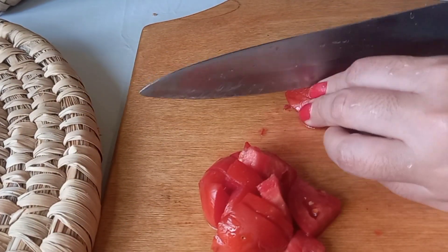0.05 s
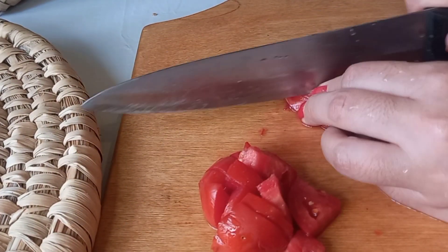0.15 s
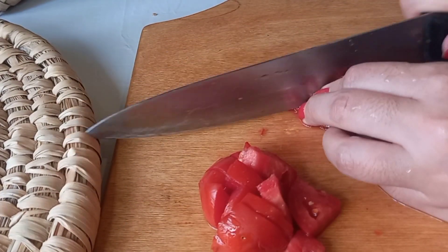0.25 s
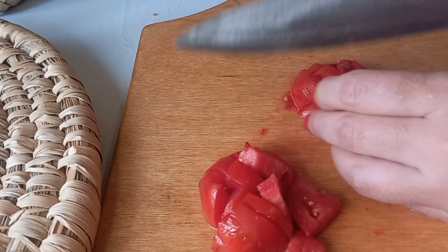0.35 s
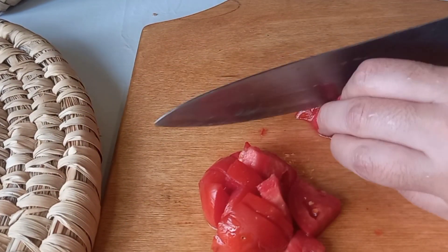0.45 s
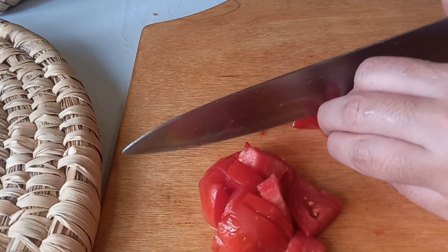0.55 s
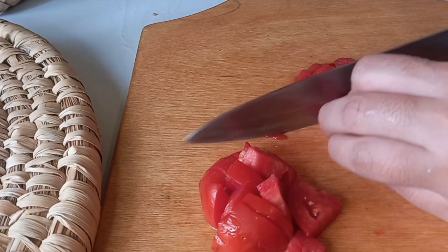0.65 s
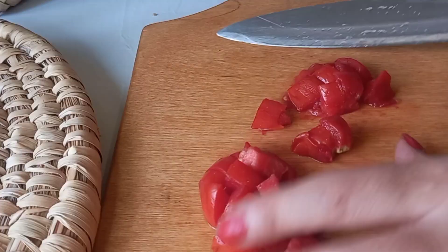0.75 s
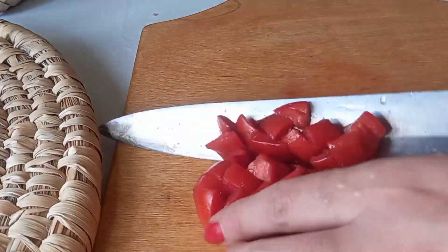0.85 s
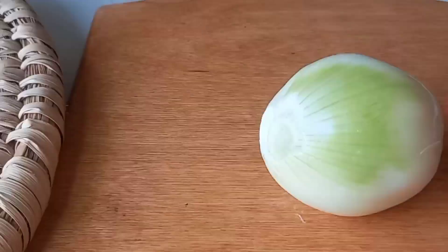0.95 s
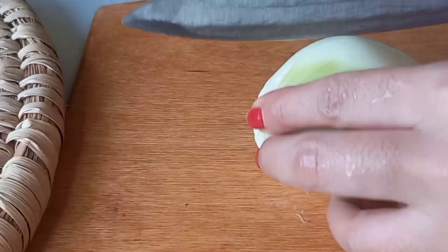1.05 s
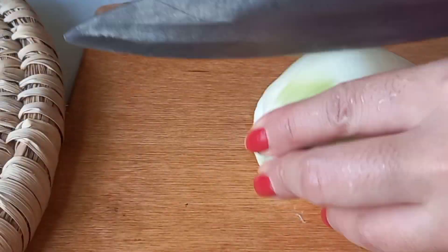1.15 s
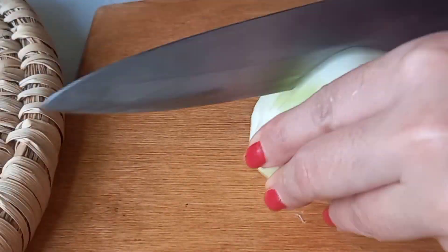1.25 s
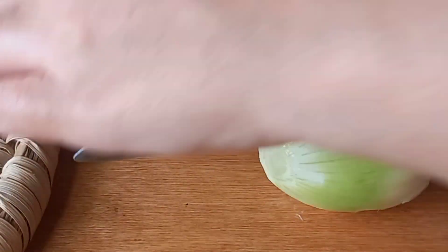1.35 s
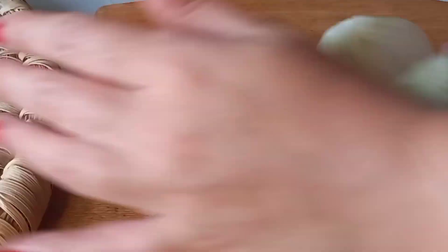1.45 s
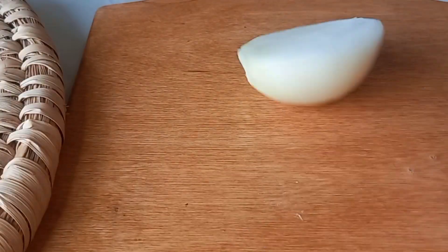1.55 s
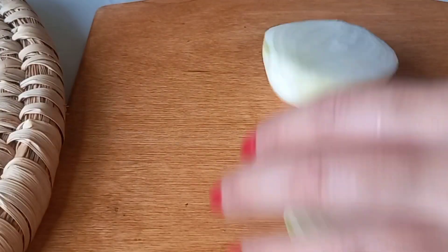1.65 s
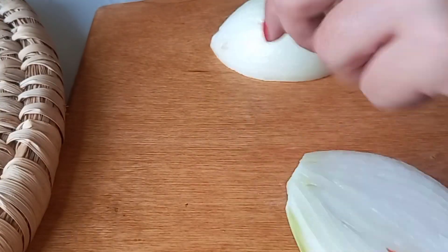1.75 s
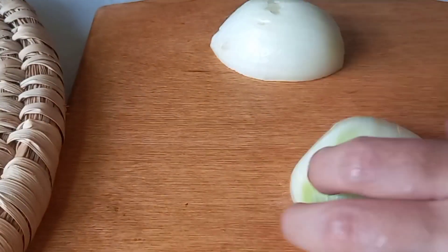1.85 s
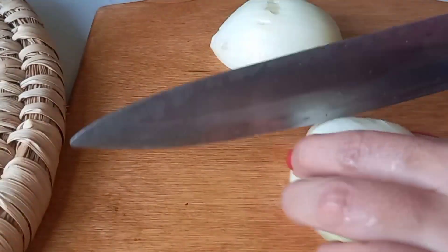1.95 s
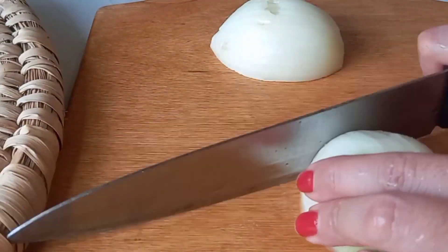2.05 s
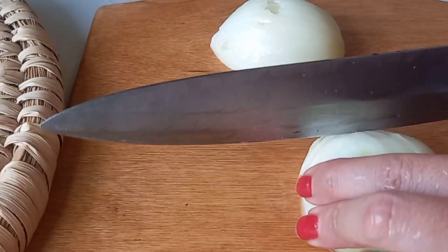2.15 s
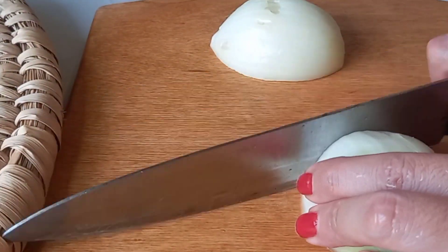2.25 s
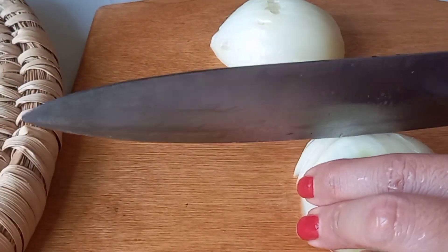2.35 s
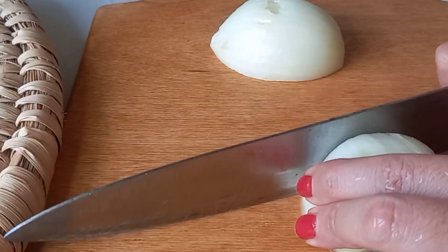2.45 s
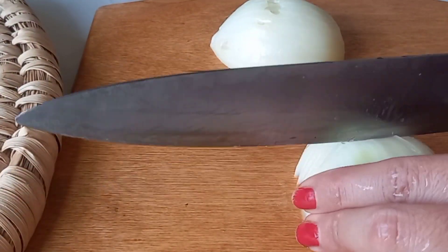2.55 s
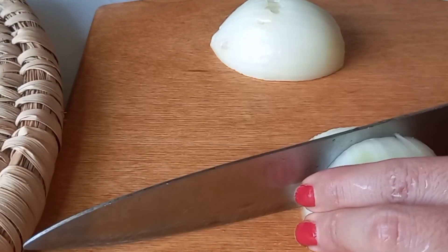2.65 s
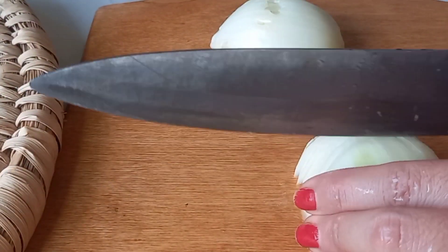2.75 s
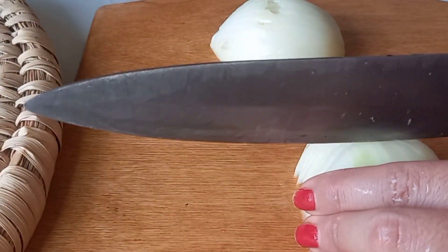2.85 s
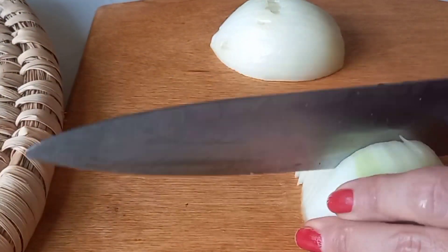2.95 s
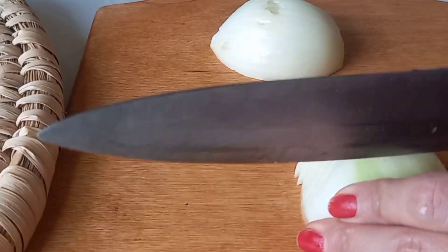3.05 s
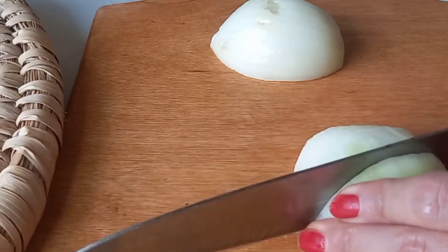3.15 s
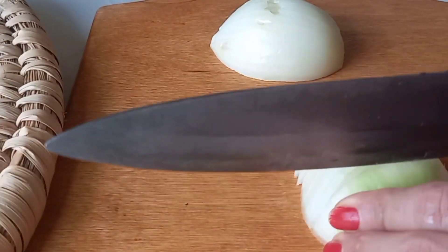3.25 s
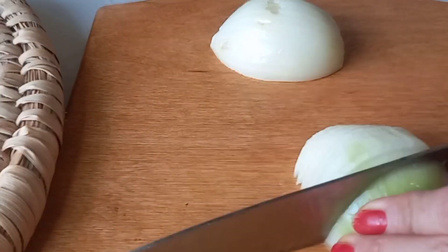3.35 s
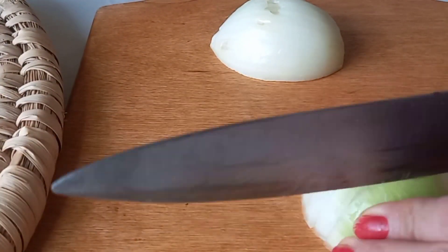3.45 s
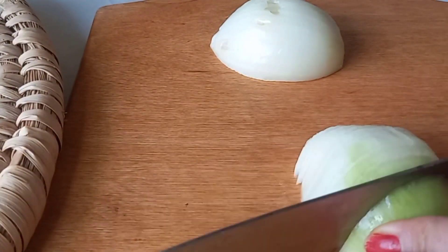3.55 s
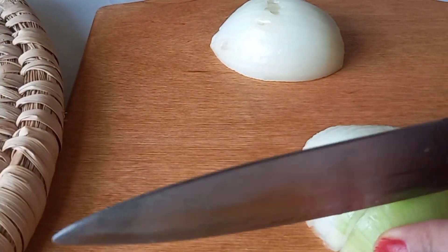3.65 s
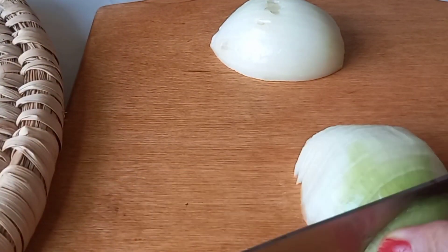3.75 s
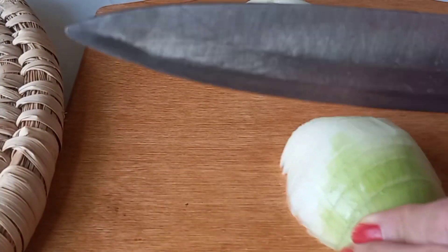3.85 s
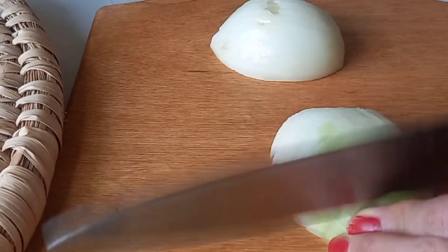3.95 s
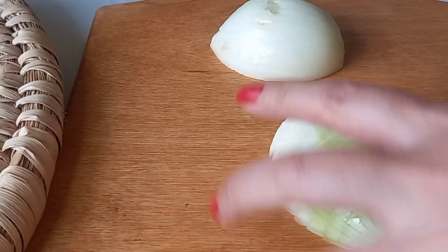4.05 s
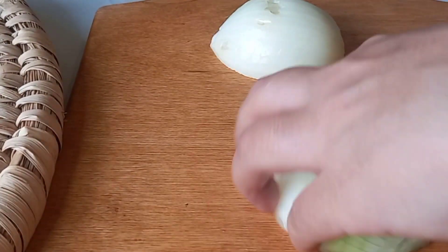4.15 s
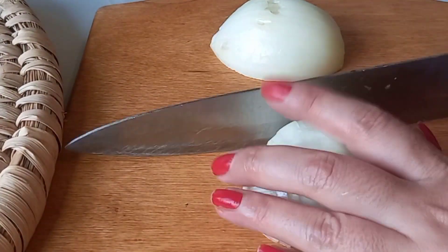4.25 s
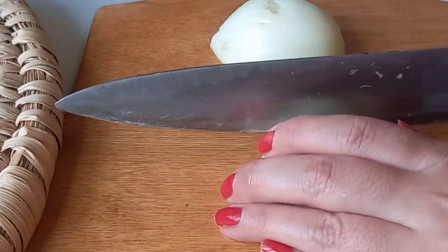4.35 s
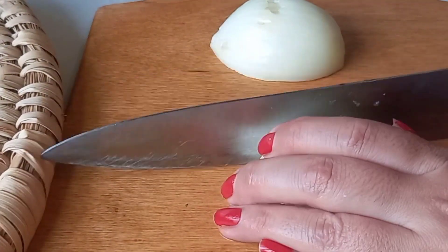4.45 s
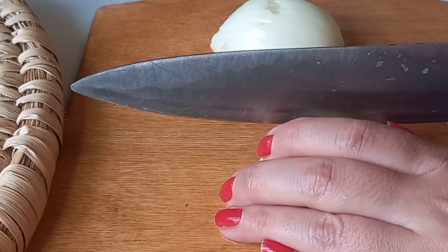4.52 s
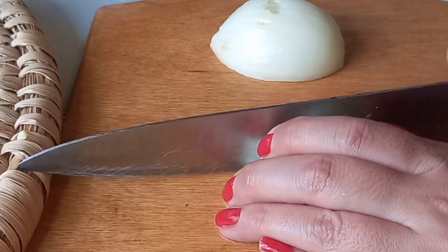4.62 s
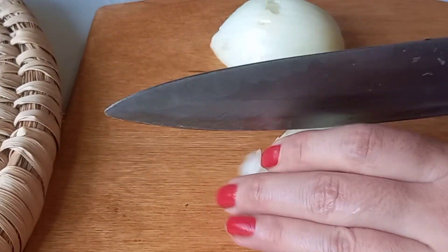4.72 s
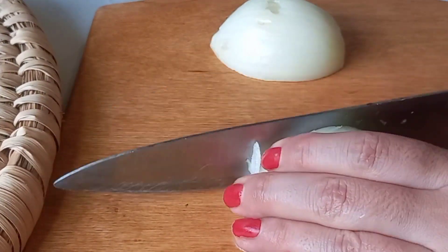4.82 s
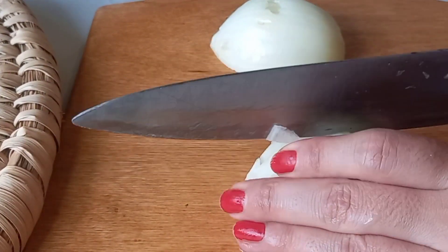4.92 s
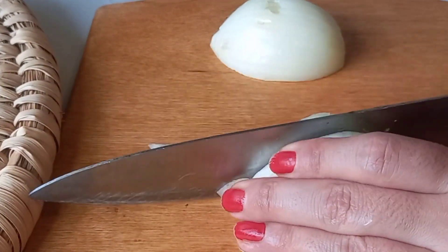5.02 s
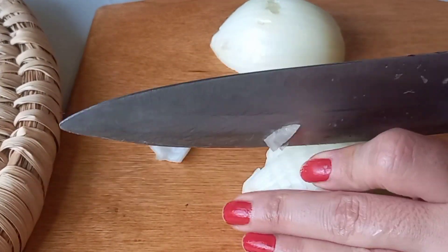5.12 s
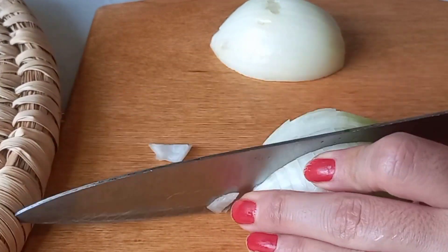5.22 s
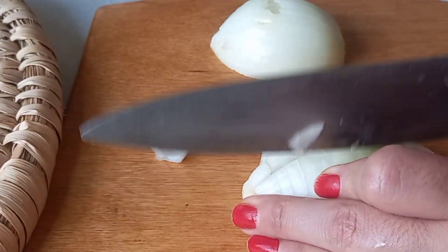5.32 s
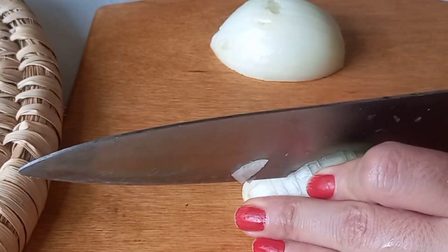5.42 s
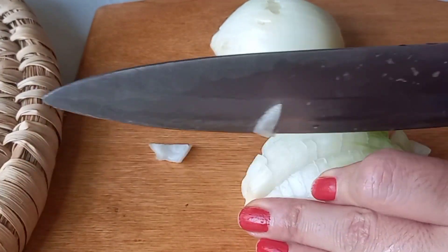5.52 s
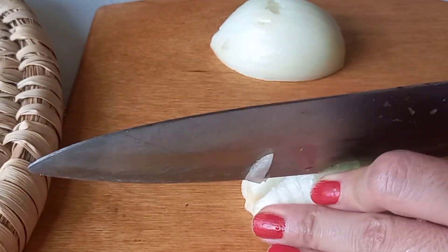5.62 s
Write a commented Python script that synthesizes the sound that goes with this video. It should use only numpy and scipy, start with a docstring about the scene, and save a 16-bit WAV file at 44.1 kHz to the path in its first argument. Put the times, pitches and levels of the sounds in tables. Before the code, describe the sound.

A knife crunches wetly through tomato, then onion, on a wooden board, with one deep halving thud and dull uneven knocks in a quiet kitchen.

```python
"""A quiet kitchen, wavering noise and a soft hiss, lies under a low rumble that swells and sinks.
A knife cuts tomato, then onion, on a wooden board close under a phone: cells burst as dense clicks,
the hand's push rocks the board, then the edge knocks and chatters, exciting the board's damped modes.
Early on the onion is halved with a deep thud, a brief low sway of the board that swells and dies away.
Late on the blade scrapes once: random slips ring its narrow resonances."""
import sys
import numpy as np
from scipy import signal
from scipy.fft import rfft, irfft
from scipy.io import wavfile

SR = 44100
rng = np.random.default_rng(int(sys.argv[2]) if len(sys.argv) > 2 else 0)


def put_to_file(sound):
    """Save the sound as 16-bit audio at rate SR, in the file named by the first command-line argument."""
    columns = np.atleast_2d(sound).T  # one column per channel
    safe = np.clip(columns, -1, 1)
    whole_steps = np.round(safe * 32767)
    wavfile.write(sys.argv[1], SR, whole_steps.astype(np.int16))


N = 250488
TIME = np.arange(N) / SR

# Spectrum of the kitchen's noise. Each row: frequency in Hz, relative level in dB.
KITCHEN_SPECTRUM = [(20, 10), (50, 18), (110, 16), (220, 0.5), (400, 15.5), (600, -30), (1500, -65),
                    (3000, -114), (8000, -25.5), (16000, -32)]
# Spectrum of the soft hiss. Each row: frequency in Hz, relative level in dB.
HISS_SPECTRUM = [(200, 14.5), (450, 12.5), (900, 5.5), (1600, 2.5), (3000, -0.5), (5000, -4.5),
                 (6700, -3.5), (7400, -25.5), (10000, -19.5), (12000, -31.5), (16000, -36.5)]
# Rise and fall of the hiss. Each row: time in seconds, level in dB before a fixed gain.
HISS_LEVEL = [(0.0, -84), (0.88, -81), (1.36, -70), (1.52, -70), (1.93, -65), (2.17, -65), (2.75, -60),
              (3.04, -65), (3.15, -73), (3.59, -76), (3.7, -82), (3.97, -81), (4.1, -76), (4.52, -77),
              (4.78, -71), (5.08, -71), (5.44, -79), (5.68, -78)]
# Course of the low rumble. Each row: time in seconds, level in dB, centre in Hz before the waver.
RUMBLE = [(0, -82, 100), (.9, -78, 110), (1.25, -61, 118), (1.65, -61, 122), (1.88, -45, 130),
          (2.05, -60, 150), (2.27, -46, 232), (2.55, -43, 142), (2.78, -50, 122), (3.08, -42, 102),
          (3.22, -48, 100), (3.45, -46, 130), (3.64, -63, 115), (4.05, -58.5, 110), (5.68, -66, 110)]
# The edge goes through flesh. Each row: start in seconds, length in seconds, crackle level in dB,
# build-up from start to end in dB, board body and fizz in dB relative to the crackle,
# rocking of the board in dB.
CUTS = [(0.236, .025, -67, 0, -3, -25, -51), (0.269, .033, -59, -2, -8, 0, -65),
        (0.5, .03, -70, 0, -10, -22, -70), (0.599, .095, -72, 0, 6, -10, -70),
        (0.759, .003, -45, 0, 9, -18, -70), (0.764, .09, -67, -9, 14, -11, -56),
        (0.911, .003, -52, 0, -7, -3, -70), (0.997, .031, -75, 0, 19, -16, -65),
        (1.212, .007, -43, 0, -8, -13, -36), (1.222, .07, -61, 0, -12, -7, -52),
        (1.299, .023, -48, 0, -1, -9, -37), (1.385, .031, -53, 8, 10, -11, -50),
        (1.418, .022, -29.5, 0, -2, -9.5, -50), (1.446, .032, -47, -3, 4, -8, -50),
        (1.862, .027, -60, 0, 9, -8, -34), (2.017, .064, -52.5, 2, 8, -6, -50),
        (2.192, .045, -52, 19, 10, -3, -35), (2.377, .045, -50, 21, 9, -2, -50),
        (2.603, .017, -33, -6, 2, -11, -30), (2.626, .022, -37, 3, 3, -5, -45),
        (2.901, .0033, -28, 0, 7, -8, -50), (2.906, .015, -37.5, 0, -6, -3, -50),
        (3.092, .02, -31.5, 11, 1, -8, -29), (3.302, .019, -36, 12, 1, -10.5, -29),
        (3.348, .015, -30, -3, 3, -10, -25), (3.472, .013, -38, -6, 7, -7, -50),
        (3.501, .04, -57, 6, 14, -15, -48), (3.672, .025, -55, 0, 12, -9, -44),
        (3.949, .016, -35, 8, -5, -8, -36), (3.98, .039, -58, 0, 1, -9, -27),
        (4.422, .02, -37, 2, 0, -3, -36), (4.55, .045, -56, 0, 10, -7, -60),
        (4.594, .022, -45.5, 0, 8, -1, -31), (4.628, .024, -48, 0, 3, -2, -40),
        (4.744, .049, -50, 12, 13, -6, -29), (4.93, .019, -61, 0, 1, 2, -60),
        (4.957, .047, -43, 10, 10, -6, -28), (5.143, .079, -44, 8, 4, -7, -28),
        (5.366, .083, -45.5, 15, 5, -10, -34), (5.62, .06, -63.5, 0, 15, -8, -35)]
# Spectrum of bursting cells and of grit. Each row: frequency in Hz, relative level in dB.
CRACKLE_SPECTRUM = [(900, -16), (1800, 3.5), (2500, 8.5), (4200, 7), (6500, 6.5), (7300, -6), (9000, -27.5)]
# Spectrum of the treble of a cut. Each row: frequency in Hz, relative level in dB.
FIZZ_SPECTRUM = [(5500, -13), (7200, -9.5), (8200, 5.5), (10000, 11.5), (12500, 11), (15500, 9.5),
                 (17000, -7.5)]
# Bumps of hand and onion on the board. Each row: time of the peak in seconds, level in dB, frequency in Hz.
THUDS = [(1.062, -40, 157), (1.4315, -7, 118), (1.62, -39, 140), (1.765, -33, 115), (2.063, -24, 174),
         (2.81, -37, 70), (2.924, -19, 195), (4.04, -40, 97), (4.34, -39.5, 97), (5.335, -44, 110)]
# The edge meets the board. Each row: start in seconds, nominal level in dB over 10 ms,
# nominal ring (time to fall 60 dB) in seconds, centre of tone in Hz, nominal clack in dB
# relative to the tone, left minus right in dB.
KNOCKS = [(0.306, -50.5, .042, 450, -10, 0), (0.757, -44, .054, 855, 9, -5),
          (0.796, -47, .11, 700, -12, -4), (0.853, -47, .06, 460, -19, -5),
          (1.004, -48, .077, 580, -10, -11), (1.409, -35, .04, 735, 0, -18),
          (1.439, -39.5, .059, 630, 6, -7), (1.466, -41, .12, 630, 2, -2), (2.057, -29, .066, 480, -16, 1),
          (2.254, -32, .043, 540, -14, -2), (2.432, -24.5, .043, 457, -22, -2),
          (2.606, -20, .043, 730, -30, 0), (2.65, -33, .026, 400, -21, -2),
          (2.9193, -11.5, .014, 620, -15, -5), (2.924, -21, .018, 400, -20, -2),
          (3.1, -24.5, .035, 770, -18, -8), (3.1494, -20.5, .026, 685, -9.5, -4),
          (3.158, -24.5, .05, 670, -10, 0), (3.317, -28, .022, 700, -14, -7),
          (3.365, -28.5, .066, 470, -13, -2), (3.476, -26, .036, 780, -20, -6),
          (3.541, -25, .044, 530, -13.5, -3), (3.748, -24.5, .022, 650, -8, 0),
          (3.7557, -19.5, .04, 770, -9, -2), (3.958, -25, .044, 820, -17, -3.5),
          (3.996, -36, .058, 400, -13, 2), (4.05, -50, .07, 480, -7, -4), (4.124, -43, .07, 620, -13, -11),
          (4.238, -34, .053, 606, -21, -3), (4.428, -22, .037, 1000, -12, -2.5),
          (4.4435, -28, .034, 560, -20, -4), (4.635, -35, .072, 470, -25, -3.5),
          (4.789, -23, .02, 700, -20, -11), (4.7985, -25, .047, 620, -15, 0),
          (5.002, -26, .045, 510, -21, -1), (5.18, -37, .043, 700, -12, -7),
          (5.213, -16.5, .012, 800, -19, -1), (5.4465, -19.5, .015, 730, -8.5, -1),
          (5.451, -17, .043, 680, -11, -6), (5.653, -46.5, .065, 608, -22, -12)]
# Modes of the board, before chance at each knock or cut. Each row: frequency in Hz, relative level in dB.
BOARD_MODES = [(135, -11.5), (200, 3), (312, -3), (415, 3.5), (510, -2.5), (620, -21), (716, 4.5),
               (790, -1), (905, 0.5), (1040, -9), (1230, -7.5), (1520, -4.5), (1700, -10.5), (1930, -10.5),
               (2250, -10.5), (2680, -23), (3080, -25), (3610, -37), (4040, -26.5)]
# Spectrum of the board's dense reflections. Each row: frequency in Hz, relative level in dB.
WOOD_SPECTRUM = [(60, -35.5), (150, 5.5), (400, -6), (800, -7), (1300, -6), (2000, -16.5), (4300, -25.5),
                 (5200, -35), (8000, -45.5), (16000, -40.5)]
# Resonances of the scraping blade. Each row: frequency in Hz, width in Hz, relative level in dB.
BLADE_RESONANCES = [(1269, 38, 21), (1530, 34, -3), (1750, 45, -11), (1950, 49, 0), (2110, 49, -1.5),
                    (2775, 83, -43), (4010, 253, -16.5)]

# the blade passes one layer of flesh after another, with a lull between them
LAYER_S, LULL_SHARE, LULL_DB, BITE_S = .029, .27, -13, .006
# partway through each cut the hand's push rocks the board; heavier pushes rock it for longer
ROCK_SHARE, ROCK_HZ = .55, 108
# half length of the sway at 0 dB in cycles, and its change per dB of level
ROCK_CYCLES, ROCK_CYCLES_PER_DB = .78, .008
# dull knocks carry more of the board's bass than bright ones
BASS_DB, MIDDLE_HZ, BASS_DB_PER_OCTAVE = -7, 600, -3
# the scrape bites quickly and dies away as the blade lifts
SCRAPE_S, SCRAPE_DB, SCRAPE_RISE_DB_PER_S, SCRAPE_FALL_DB_PER_S = 4.549, -23.5, 2300, 600
TOP_HZ = 16000


def undb(db):
    """Amplitude ratio: decibels to gain."""
    return 10 ** (np.asarray(db) / 20)


def curve(rows):
    """Linear interpolation: each column of a table, joined by straight lines in time."""
    s, *columns = np.transpose(rows)
    return [np.interp(TIME, s, c) for c in columns]


def level(x, db, seconds):
    """Energy normalisation: the sound's energy equals that level held for that long."""
    energy_s = np.mean(np.sum(x ** 2, axis=-1)) / (seconds * SR)
    return x * undb(db) / np.sqrt(energy_s + 1e-20)


def through(x, response):
    """Convolution: a sound played through an impulse response, on both channels."""
    return signal.fftconvolve(np.atleast_2d(x), np.atleast_2d(response), axes=-1)[:, :x.shape[-1]]


def colour(x, points):
    """Minimum phase: a causal filter through (Hz, dB) points, built by folding the cepstrum."""
    hz, db = np.transpose(points)
    grid = np.fft.rfftfreq(2048, 1 / SR)
    gain_db = np.interp(np.log(grid + 1), np.log(hz), db)
    cepstrum = irfft(np.log(undb(gain_db)))
    half = len(cepstrum) // 2
    folded = np.r_[cepstrum[0], 2 * cepstrum[1:half], np.zeros(half)]
    return through(x, irfft(np.exp(rfft(folded))))


def band(x, kind, hz, order=3):
    """Butterworth filtering: a maximally flat pass band."""
    return signal.sosfilt(signal.butter(order, hz, kind, fs=SR, output="sos"), x)


def pair(size, apart):
    """Partial coherence: left and right noise with a shared part and a part of their own."""
    shared = rng.standard_normal(size)
    return (shared + apart * rng.standard_normal((2, size))) / np.hypot(1, apart)


def walk(rate, t=TIME):
    """Slow chance: random knots, rate per second, joined by lines, with a spread near 1."""
    knots = rng.standard_normal(int(t[-1] * rate) + 2)
    return np.interp(t * rate, np.arange(len(knots)), knots)


def add(out, s, sound, pan_db=0):
    """Superposition: mix a sound in at its time, panned by a level difference between channels."""
    start = max(int(s * SR), 0)
    lean = undb(np.array([[pan_db], [-pan_db]]) / 2)
    lean = lean / np.sqrt(np.mean(lean ** 2))
    out[:, start:start + sound.shape[-1]] += (sound * lean)[:, :max(N - start, 0)]


def background(kitchen_db=-66, hiss_gain_db=10.2):
    """Filtered noise under slow modulation: the faint kitchen and a soft hiss that comes and goes."""
    kitchen = level(colour(pair(N, 0.54), KITCHEN_SPECTRUM), kitchen_db, N / SR)
    kitchen = kitchen * undb(4.5 * walk(4))
    hiss = level(colour(pair(N, 1.0), HISS_SPECTRUM), hiss_gain_db, N / SR)
    hiss = hiss * undb(curve(HISS_LEVEL)[0] + 1.2 * walk(31))
    return kitchen + hiss


def rumble(width_hz=32, skirt_db=-7, waver_octaves=0.11):
    """Narrow-band noise: slow complex noise modulates a low carrier of wavering pitch."""
    db, hz = curve(RUMBLE)
    hz = hz * 2 ** (waver_octaves * walk(25))
    noise = rng.standard_normal(N) + 1j * rng.standard_normal(N)
    flutter = band(noise, "lowpass", width_hz, order=2)
    core = np.real(flutter * np.exp(2j * np.pi * np.cumsum(hz) / SR))
    skirt = band(pair(N, .12), "bandpass", [45, 350], order=2)
    return (level(core, 0, N / SR) + level(skirt, skirt_db, N / SR)) * undb(db)


def board(t, ring_s, longest_s=0.027, detune=.03, port_turn=0.74, dense_db=-6):
    """Modal superposition: each knock or cut rings modes, weighted anew, and reflections off the counter."""
    hz, db = np.transpose(BOARD_MODES)[:, :, None]
    hz = hz * (1 + detune * rng.standard_normal(hz.shape))
    size = undb(db + 4 * rng.standard_normal(hz.shape))
    # higher modes reach the two microphone ports in different phase
    turn = port_turn * np.minimum(hz / 800, 2) * rng.standard_normal((2,) + hz.shape)
    # hand and vegetable damp the wood, so no mode rings for long and the high ones die first
    t60 = min(ring_s, longest_s) * (800 / hz) ** .25
    modes = np.sum(size * np.sin(2 * np.pi * hz * t + turn) * undb(-60 * t / t60), axis=1)
    dense = colour(pair(len(t), 1.58), WOOD_SPECTRUM) * undb(-60 * t / (ring_s * 1.22))
    contact = 1 - np.exp(-t / .0002)
    return (level(modes, 0, 1) + level(dense, dense_db, 0.45)) * contact


def cuts(cells_per_s=5000, spread_db=5.5, apart=2.54, swell=0.46, snap_s=0.0039,
         release_s=0.0034, body_ring_s=0.029):
    """Random fracture: cells burst under the edge as clicks of uneven size, and the board sounds along."""
    out, t = np.zeros((2, N)), np.arange(SR // 6) / SR
    for s, length, db, build_db, body_db, fizz_db, _ in CUTS:
        length = max(length, .002)
        # skin snaps at once; in a longer cut the pressure builds, holds while the flesh tears and lets go
        rise_s = np.clip(swell * (length - snap_s), .0003, BITE_S)
        fall_s = min(release_s, length / 3)
        push = np.minimum(t / rise_s, 1) * np.exp(-np.maximum(t - length * 0.9, 0) / fall_s)
        push = push * undb(build_db * np.minimum(t / length, 1))
        # the layers give way one after another
        lull = t / LAYER_S % 1 > 1 - LULL_SHARE
        layers = undb(LULL_DB * lull + 2.7 * walk(450, t))
        burst_now = rng.random(len(t)) < cells_per_s / SR
        bursts = burst_now * undb(spread_db * np.minimum(rng.exponential(size=len(t)), 3))
        clicks = push * layers * (bursts + 0.74) * pair(len(t), apart)
        body = through(clicks.mean(axis=0), board(t, body_ring_s, dense_db=-1))
        body = band(body, "highpass", 200, order=2)
        add(out, s, level(colour(clicks, CRACKLE_SPECTRUM), db, length), pan_db=1.5)
        add(out, s, level(colour(clicks, FIZZ_SPECTRUM), db + fizz_db, length), pan_db=-2)
        add(out, s, level(body, db + body_db, length), pan_db=-1.5)
    return out


def thuds(upper_ratio=1.65, upper_db=-15):
    """Low-frequency flexure: the hand's weight rocks the board briefly and bends it a little."""
    out, t = np.zeros((2, N)), np.arange(-SR // 20, SR // 20) / SR
    pushes = [(s + ROCK_SHARE * length, rock_db, ROCK_HZ) for s, length, *_, rock_db in CUTS]
    for s, db, hz in list(THUDS) + pushes:
        half_s = max(ROCK_CYCLES + ROCK_CYCLES_PER_DB * db, .2) / hz
        rocking = np.cos(2 * np.pi * hz * t)
        bending = undb(upper_db) * np.sin(2 * np.pi * upper_ratio * hz * t)
        bell = np.exp(-(t / half_s) ** 2 / 2)
        add(out, s + t[0], undb(db) * (rocking + bending) * bell)
    return out


def knocks(bounce=.7, chatter=.25, focus_db=2.4, knock_db=.5):
    """Impact excitation: the edge lands, then rolls down along its length in a few smaller taps."""
    out, t = np.zeros((2, N)), np.arange(SR // 8) / SR
    for s, db, ring_s, hz, clack_db, pan_db in KNOCKS:
        taps = np.zeros(len(t))
        taps[0] = 1
        late = rng.uniform(.2, 1, size=3)
        places = (late * min(chatter * ring_s, .1) * SR).astype(int) + 1
        taps[places] += bounce * (1.3 - late)
        wood = through(taps, board(t, ring_s))
        # the spot that is struck and the softness of the contact favour one region of modes
        focus = [(hz * 2.0 ** octave, -2 * focus_db * abs(octave)) for octave in (-2, -1, 0, 1, 2)]
        tone = colour(band(wood, "bandpass", [260, 1500], order=2), focus)
        bass = band(band(wood.mean(axis=0), "lowpass", 220), "highpass", 90, order=1)
        bass_db = BASS_DB + BASS_DB_PER_OCTAVE * np.log2(hz / MIDDLE_HZ)
        clack = band(wood, "highpass", 1500, order=4)
        sound = level(tone, knock_db, 1) + level(bass, bass_db, 1) + level(clack, clack_db, 0.56)
        # a tenth in amplitude turns energy over 1 s into energy over 10 ms
        add(out, s, sound * undb(db) / 10, pan_db)
    return out


def scrape(slips_per_s=2500, grit_db=-3, grit_top_db=-41):
    """Stick-slip: tiny slips over the wood ring the blade, whose tones rise above the capped grit."""
    rise_db = (SCRAPE_S - TIME) * SCRAPE_RISE_DB_PER_S
    fall_db = (TIME - SCRAPE_S) * SCRAPE_FALL_DB_PER_S
    db = np.maximum(SCRAPE_DB - np.maximum(rise_db, fall_db), -160)
    slips = (rng.random(N) < slips_per_s / SR) * pair(N, 1.66)
    steel = np.zeros((2, N))
    for hz, width_hz, size_db in BLADE_RESONANCES:
        resonance = signal.iirpeak(hz, hz / width_hz, fs=SR)
        steel += undb(size_db) * signal.lfilter(*resonance, slips)
    steel = level(band(steel, "highpass", 670), 0, N / SR) * undb(db)
    grit = level(colour(slips, CRACKLE_SPECTRUM), grit_db, N / SR)
    return steel + grit * undb(np.minimum(db, grit_top_db))


def room(x, t60_s=0.097, wet_db=-36):
    """Reverberation: a short, dull answer from the kitchen walls, as decaying noise."""
    t = np.arange(SR // 2) / SR
    tail = band(pair(len(t), 1.0), "lowpass", 2000, order=2)
    tail = tail * undb(-60 * t / t60_s) * (1 - np.exp(-t / 0.0027))
    return through(band(x, "highpass", 200, order=2), level(tail, wet_db, 1 / SR))


def scene():
    """Superposition of sources: knife and board close by, the kitchen behind."""
    work = knocks() + cuts() + thuds() + scrape()
    return work + room(work) + rumble() + background()


def record(dry):
    """Band limiting: a bass cut, a soft ceiling that keeps peaks below full scale, and a top cut."""
    x = band(dry, "highpass", 26, order=1)
    x = x / (1 + x ** 8) ** (1 / 8)
    return signal.sosfilt(signal.ellip(8, .2, 70, TOP_HZ, fs=SR, output="sos"), x)


dry = scene()
out = record(dry)
put_to_file(out)
```